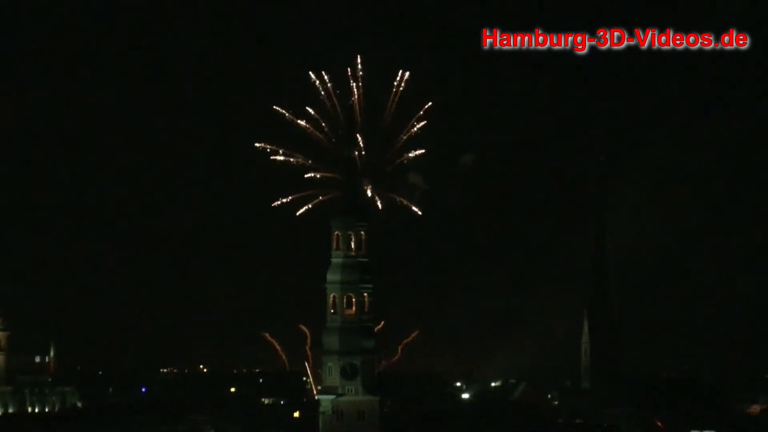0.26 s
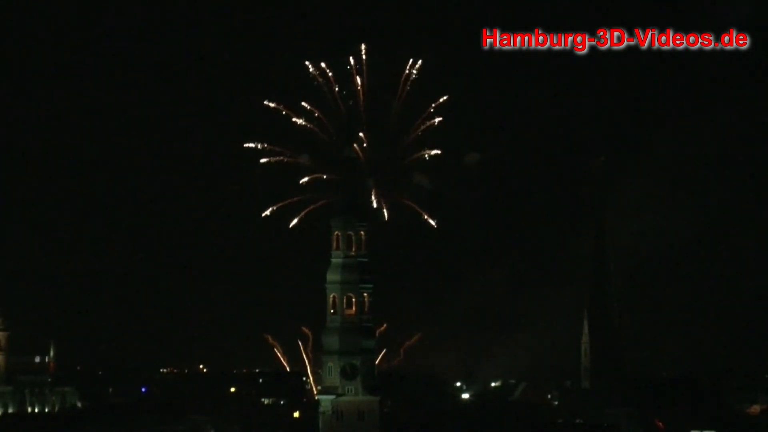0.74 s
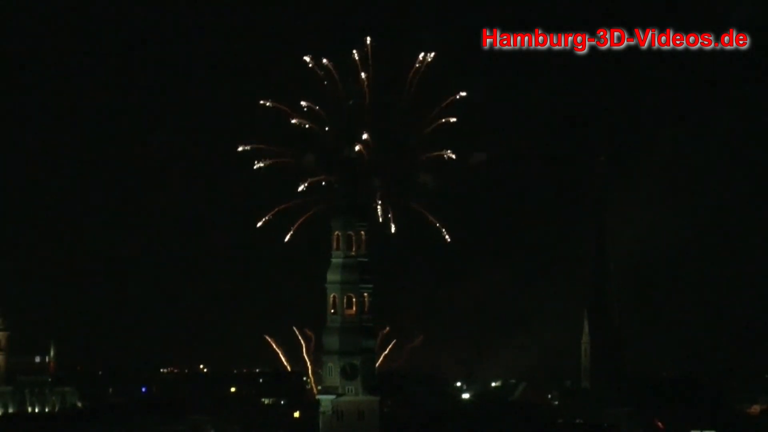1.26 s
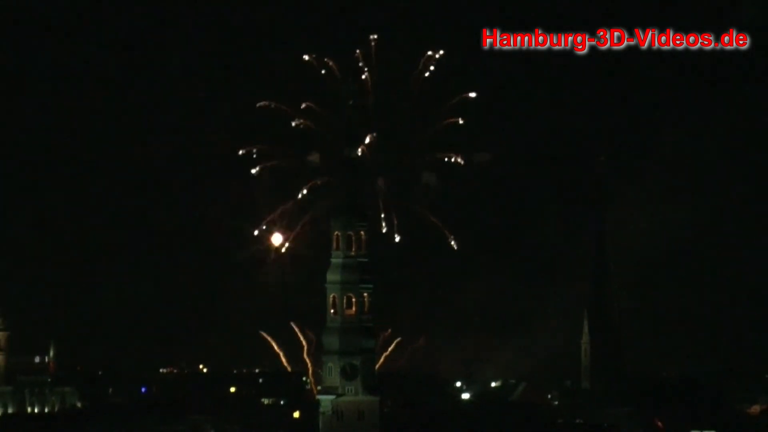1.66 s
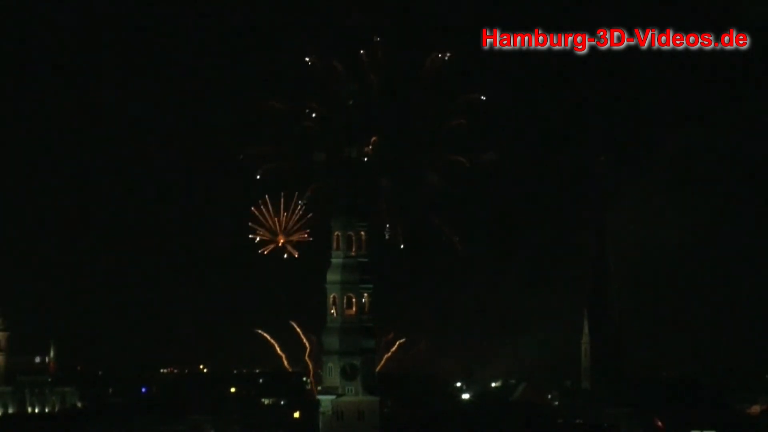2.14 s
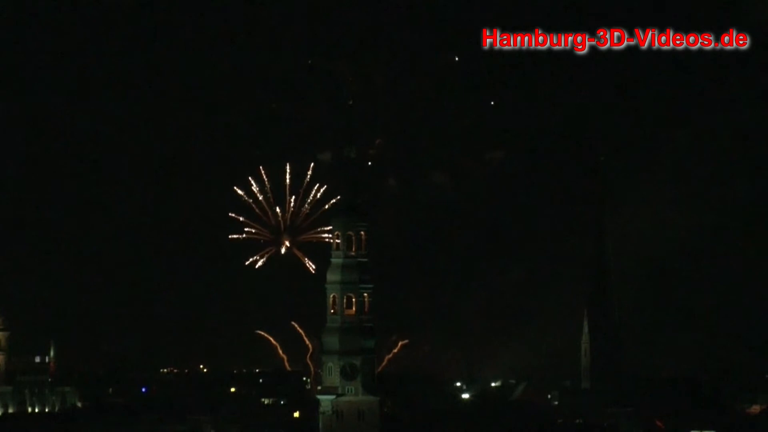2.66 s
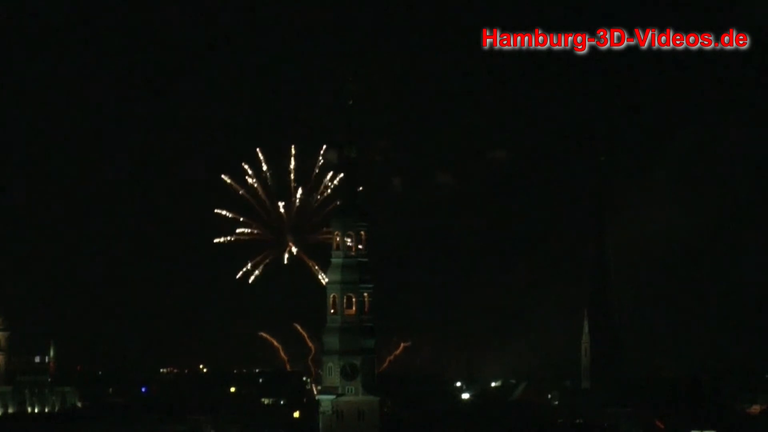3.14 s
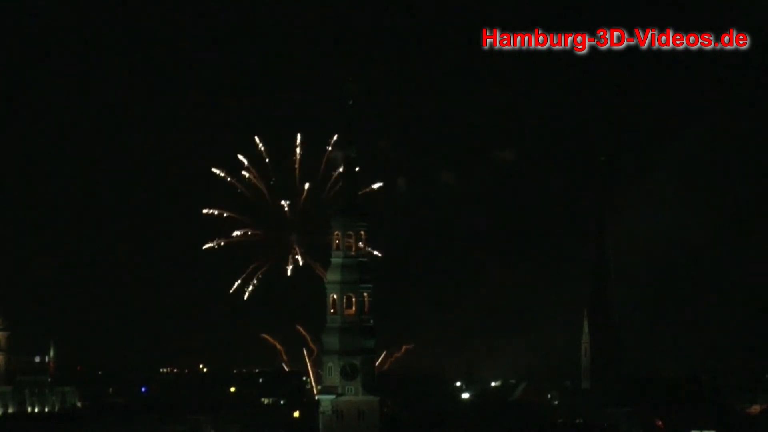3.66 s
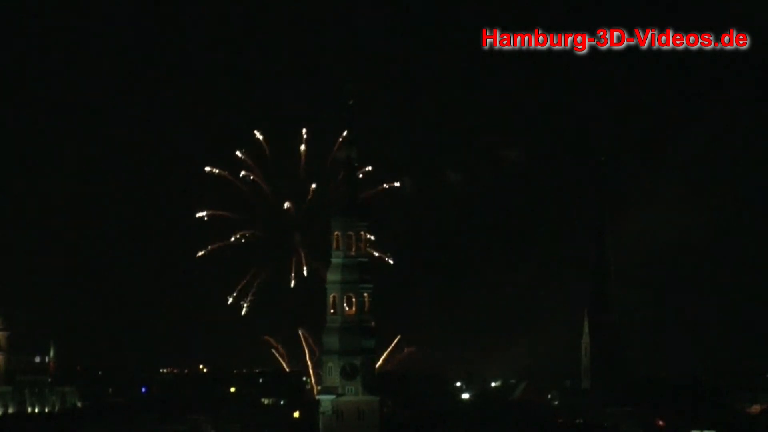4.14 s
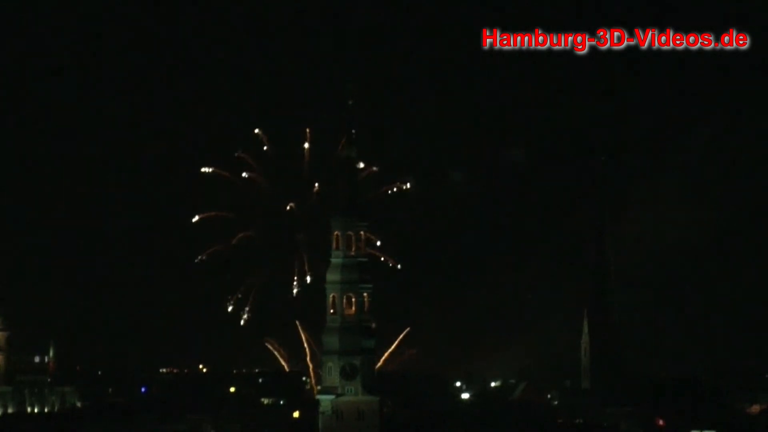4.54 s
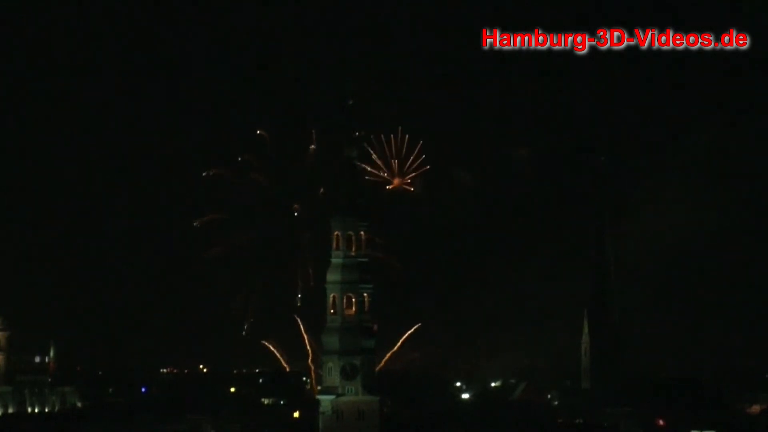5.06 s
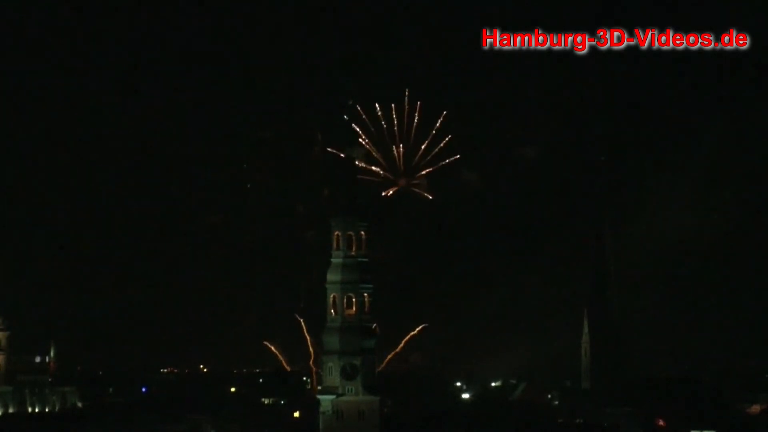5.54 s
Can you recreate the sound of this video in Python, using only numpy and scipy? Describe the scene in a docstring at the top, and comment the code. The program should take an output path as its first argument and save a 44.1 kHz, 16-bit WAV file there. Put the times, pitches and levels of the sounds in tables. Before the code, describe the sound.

Distant fireworks bang over a rolling rumble of echoes, with faint crackles and wind buffeting the microphone.

```python
"""Firework shells bang now and then over a town at night, far from a small camera in a breeze.
Each bang is a push of pressure and a pull of suction, dulled by the air. Echoes off roofs and walls merge
with the rush of comets into a rolling roar, while faint ticks and sparks flick through the treble.
Wind buffets the microphone over a thin circuit hiss, and the loudest bang overloads."""
import sys
import numpy as np
from scipy import signal
from scipy.fft import rfft, irfft, next_fast_len
from scipy.io import wavfile
from scipy.ndimage import uniform_filter1d

SR = 44100
rng = np.random.default_rng(int(sys.argv[2]) if len(sys.argv) > 2 else 0)


def master_out(mix):
    """Clip the mix to full scale and print it as 16-bit PCM to the path in sys.argv[1]."""
    frames = np.transpose(np.atleast_2d(mix))
    ceiling = np.clip(frames, -1, 1)
    pcm = np.round(ceiling * 32767).astype(np.int16)
    wavfile.write(sys.argv[1], SR, pcm)


N = 255339

# Tone curves of the noise layers: f/Hz, relative level/dB
HISS_EQ = [(3000, -16), (6000, -12), (10000, -14), (17000, -14)]  # circuit noise
HEAVE_EQ = [(8, 11), (16, -1), (28, 2.5), (42, -4), (60, -27.5), (110, -46)]  # slow wind
FLUTTER_EQ = [(30, -18.5), (46, 1.5), (75, -3.5), (105, -10.5), (200, -39.5)]  # quick wind
SIZZLE_EQ = [(2600, -3.5), (3600, 0), (5500, -8), (7000, -13), (9000, -22), (13000, -39)]  # sparks
RUSH_EQ = [(500, -10), (900, -1), (1200, -2), (1800, -7.5), (2400, -14), (3200, -25.5), (4200, -49),
           (6000, -64)]  # comets
ROAR_EQ = [(150, -9), (260, 7.5), (400, 4), (600, 4), (900, -9), (1500, -36.5)]  # body of the echoes
BOOM_EQ = [(60, -24), (95, 1.5), (150, 0.5), (220, -6), (300, -22.5), (450, -47)]  # low end of the echoes
# Whine of the electronics: f/Hz, rms level at the average hiss level/dB
WHINE_TONES = [(5200, -90), (6934, -90.5), (10002, -99.5), (12134, -89), (13867, -94.5)]
# Cues where the background drops after a loud peak: t/s, depth/dB
DIP_CUES = [(0.333, -9), (1.376, -5), (2.438, -1), (2.929, -4), (3.09, -3.5), (3.565, -7.5), (3.932, -6),
            (4.078, -4.5), (4.3, -4.5), (4.591, -4), (4.778, -4), (4.999, -3.5), (5.163, -6.5),
            (5.35, -3.5), (5.545, -5), (5.72, -4.5)]
# Strength of the breeze, before the dips: t/s, heave/dB, flutter/dB
BREEZE_FADERS = [(0, -12, -30.5), (.45, -19, -25.5), (.8, -19, -25), (1.2, -28.5, -26), (1.8, -31, -33),
                 (2.2, -27.5, -30), (2.75, -16, -26.5), (3.0, -11.5, -9), (3.3, -23, -25),
                 (3.62, -15.5, -28), (3.801, -15, -13), (4.3, -12, -21.5), (4.8, -16.5, -18),
                 (5.4, -14, -14), (5.79, -5.5, -14.5)]
# Single buffets on the microphone, before the dips: t/s, heave/dB, flutter/dB
BUFFET_CUES = [(0.022, -26, -20.5), (0.131, -24, -30), (.22, -22, -35), (0.659, -16, -22), (.76, -6, -30),
               (1.17, -36, -31), (1.66, -16.5, -27), (1.98, -39, -24.5), (2.1, -36, -33), (2.391, -14, -19),
               (2.669, -8, -36), (2.9, -15, -14.5), (3.021, -6.5, -8), (3.119, -4, -23),
               (3.41, -15.5, -17.5), (3.49, -12.5, -30), (3.72, -9, -10.5), (3.791, -13.5, -20.5),
               (3.85, -11, -18), (3.93, -3.5, -17), (3.99, -12, -18.5), (4.06, -5, -17.5), (4.114, -2, -30),
               (4.291, -25, -10), (4.374, -14, -28), (4.445, -18, -26), (4.5, -10, -31), (4.582, -21, -15),
               (4.679, -18, -8), (4.77, -5, -25), (4.92, -10, -26), (4.99, -2, -20), (5.172, 1, -8),
               (5.351, -3.5, -28), (5.54, 3.5, -2), (5.659, -10, -1), (5.719, 1, -16)]
# Bursts of sparks, before the dips: t/s, hold/s, level/dB, f/Hz
SPARK_CUES = [(0.256, 0.07, -66, 4520), (0.597, 0.096, -62.5, 4200), (0.75, 0.21, -69, 5400),
              (1.002, 0.23, -72, 5470), (1.32, 0.044, -66, 4400), (1.6, 0.29, -79, 4530),
              (2.265, 0.057, -65, 4200), (2.57, 0.049, -87, 4500), (2.753, .17, -82, 4500),
              (3.089, 0.16, -59, 4600), (3.317, 0.023, -58, 4000), (3.4, 0.087, -67, 5240),
              (4.954, 0.06, -65, 6300), (5.394, 0.068, -67, 4480), (5.633, 0.075, -75.5, 4500)]
# Treble ticks: t/s, band peak/dB, f/Hz, top-end rms over TOP_SPAN_S/dB
TICK_CUES = [(0.3265, -45, 4280, -58), (0.3288, -33.5, 3200, -54), (0.9278, -46, 5610, -62),
             (1.1564, -48, 5310, -62), (1.3139, -49, 4000, -65), (1.394, -49, 5000, -70),
             (1.42, -49, 4750, -72), (2.2962, -44, 4170, -67), (2.8644, -47, 4090, -62),
             (2.9043, -44, 4000, -58), (2.9246, -44, 4490, -54), (3.0364, -45, 4020, -63),
             (3.0889, -48, 4140, -65), (3.1108, -47, 4110, -70), (3.1467, -53, 5070, -71),
             (3.1744, -43, 4310, -66), (3.245, -50, 4110, -70), (3.3039, -55, 4160, -70),
             (3.3194, -44, 4250, -69), (3.4975, -36, 5000, -62), (3.5, -46, 6800, -62),
             (3.5583, -16.5, 3560, -46), (3.5857, -52, 4100, -78), (3.706, -46, 4380, -74),
             (3.828, -45, 4090, -72), (3.928, -40.5, 4340, -62), (3.962, -45.5, 4060, -59),
             (4.0612, -44, 4000, -61), (4.08, -47, 2500, -73), (4.293, -51, 5000, -60),
             (4.2985, -43, 4540, -60), (4.4986, -46, 4100, -65), (4.59, -40, 5000, -57),
             (4.775, -42, 4030, -63), (4.8894, -56, 4150, -66), (4.9814, -45, 4010, -60),
             (5.006, -49, 4110, -59), (5.158, -43.5, 4110, -71), (5.19, -46, 4010, -67),
             (5.4116, -48, 4030, -68.5), (5.4595, -51, 4160, -70), (5.5356, -40, 4080, -60),
             (5.575, -58, 7000, -71), (5.655, -39, 3940, -61), (5.678, -42, 4330, -57),
             (5.696, -41, 3980, -60), (5.717, -44, 4000, -66)]
# Running bed of the display, before the dips: t/s, rush/dB, roar/dB, boom/dB
DISPLAY_FADERS = [(0, -32, -30.5, -30.5), (.3, -32.5, -33, -27.5), (.6, -30, -24, -17),
                  (1.0, -36, -28.5, -25), (1.15, -33, -27.5, -21.5), (1.4, -28.5, -26, -21.5),
                  (1.55, -27.5, -27, -22), (1.9, -28, -27, -26.5), (2.2, -29, -28.5, -26),
                  (2.38, -29, -28, -25), (2.52, -35.5, -39, -35), (2.61, -29, -27.5, -27),
                  (2.69, -33, -34.5, -29.5), (2.82, -30, -29.5, -26.5), (3.3, -32.5, -32, -27),
                  (3.5, -35, -32, -26.5), (3.9, -33.5, -27, -17.5), (4.15, -40, -28, -21.5),
                  (4.3, -33, -28.5, -19), (4.5, -36, -28, -24.5), (4.75, -34, -30, -22),
                  (5.0, -32.5, -29.5, -23.5), (5.4, -27.5, -26, -20.5), (5.7, -34.5, -35.5, -29),
                  (5.79, -40, -40, -25)]
# Starts of the big shells' rolls over the town, before the dips: t/s, rush/dB, roar/dB, boom/dB
ROLL_CUES = [(0.333, -31.5, -20, -15.5), (3.565, -34, -22.5, -14.5)]
# Shell bangs and a few of their separate echoes: t/s, level before the air filters/dB, rise/ms,
# front curve (0 square, 1 ramp), suction/share of the push, recovery/ms, echo delay/ms, echo gain/dB,
# air cutoff/Hz
BANG_CUES = [(0.3283, -3.5, 2.67, 0.036, 0.9, 3.6, 6.8, -7.5, 2400),
             (.931, -1.5, 0.71, 0.96, 0.8, 1.5, 19, -14, 890), (1.158, -10.5, 2, 1, 1.5, 2.1, 7.3, -2, 600),
             (1.3636, -5.5, 0.94, 0.35, 1.3, 1, 12, -8, 1100),
             (1.758, -23, 2.6, 0.27, 1.4, 2.8, 6.1, 12, 700),
             (3.438, -9.5, 0.51, 0.4, 1.2, 0.87, 1.92, 5, 900),
             (3.559, 3.5, 0.99, 0.31, 0.55, 3.6, 5.6, -9.5, 1800),
             (3.859, -14, 6.6, 0.43, 0.65, 1.7, 2.9, -8, 600),
             (4.0797, -2, 1.08, 0.42, 0.4, 0.34, 1.57, 1.5, 1600),
             (4.0838, -8.5, 2.5, 0.1, 0.17, 1.6, 2.2, -14, 2200),
             (4.11, -27, 2.3, 0.54, 0.61, 1.5, 4.9, 1, 900),
             (4.295, -10, 2.9, 0.87, 0.73, 2.1, 3.35, 4, 605),
             (4.566, -15.5, 1.6, 0.49, 1.3, 1.5, 6.8, -10, 600)]

HISS_DB, SPARK_FLOOR_DB = -68.5, -64.5
TOP_SPAN_S = .003


def undb(db):
    """Decibels to gain."""
    return 10 ** (np.asarray(db) / 20)


def unit(x):
    """Scale to rms 1."""
    return x / np.sqrt(np.mean(x ** 2))


def add_db(*levels):
    """Level in dB of unrelated sounds heard together."""
    return 10 * np.log10(sum(undb(db) ** 2 for db in levels))


def faders(t, table):
    """The level columns of a table as straight fader moves in time."""
    times, *columns = np.transpose(table)
    return np.array([np.interp(t, times, column) for column in columns])


def colour(x, eq):
    """Shape a signal with a tone curve, at rms 1."""
    hz, db = np.transpose(eq)
    size = next_fast_len(N)
    f = np.maximum(np.arange(size // 2 + 1) * SR / size, 1)
    gain = undb(np.interp(np.log(f), np.log(hz), db, -160, -160))
    return unit(irfft(rfft(x, size) * gain, size)[:N])


def band(x, hz, width):
    """A gentle band-pass around hz; width is a share of hz."""
    edge = 1 + width / 2
    return signal.sosfilt(signal.butter(1, [hz / edge, hz * edge], "band", fs=SR, output="sos"), x)


def wobble(rate_hz):
    """A smooth random drift: held steps, slewed twice."""
    hold = int(SR / rate_hz)
    steps = np.repeat(rng.standard_normal(N // hold + 1), hold)[:N]
    return uniform_filter1d(uniform_filter1d(steps, hold), hold)


def grit(per_s, spread_db, share):
    """Scattered pulses of uneven size, carrying a share of the power, over smooth noise."""
    hits = rng.random(N) < per_s / SR
    sizes = undb(spread_db * np.minimum(rng.exponential(size=N), 4))
    pulses = hits * sizes * np.sign(rng.standard_normal(N))
    return np.sqrt(share) * unit(pulses) + np.sqrt(1 - share) * rng.standard_normal(N)


def dips(t, hold_s=.079, climb_db_per_s=15):
    """Background level change in dB: drop, hold and climb back at each cue; the deepest dip wins."""
    each = [(t >= s) * np.minimum(db + climb_db_per_s * np.maximum(t - s - hold_s, 0), 0)
            for s, db in DIP_CUES]
    return np.min(each, axis=0)


def circuit_hiss(t, dip_db):
    """The camera's own noise and a thin whine that sinks and swells with it."""
    whine = sum(np.sqrt(2) * undb(db) * np.sin(2 * np.pi * hz * t) for hz, db in WHINE_TONES)
    hiss = colour(rng.standard_normal(N), HISS_EQ)
    return hiss * undb(HISS_DB + dip_db) + whine * undb(dip_db - dip_db.mean())


def wind(t, dip_db, buffet_s=.023, limit=.68):
    """Wind buffets the microphone in lumpy swings; the strongest are softly limited."""
    buffets = [np.array(db)[:, None] - 10 * ((t - s) / buffet_s) ** 2 for s, *db in BUFFET_CUES]
    heave_db, flutter_db = add_db(faders(t, BREEZE_FADERS), *buffets) + dip_db
    eddies = grit(per_s=45, spread_db=1.5, share=.4)
    centres = (np.array(BUFFET_CUES)[:, 0] * SR).astype(int)
    eddies[centres] += 30 * np.sign(rng.standard_normal(len(centres)))  # a strong eddy in each buffet
    heave = colour(eddies, HEAVE_EQ) * undb(heave_db)
    flutter = colour(eddies, FLUTTER_EQ) * undb(flutter_db)
    return limit * np.tanh((heave + flutter) / limit)


def sparks(t, dip_db, edge_s=.026):
    """Burning sparks crackle faintly and flare in gritty bursts, each with its own pitch and hold."""
    crackle = colour(grit(per_s=500, spread_db=3.3, share=.35) * undb(1.6 * wobble(40)), SIZZLE_EQ)
    out = crackle * undb(SPARK_FLOOR_DB)
    for s, hold_s, db, hz in SPARK_CUES:
        fade_db = 10 * np.maximum(np.abs(t - s - hold_s / 2) - hold_s / 2, 0) / edge_s
        out += unit(band(crackle, hz, width=.39)) * undb(db - fade_db)
    return out * undb(dip_db)


def ticks(fade_ms=1.0):
    """Each tick is a pitched spit of a millisecond or two, some with a bright top end."""
    out, ms = np.zeros(N), np.arange(300) / SR * 1000
    for s, db, hz, top_db in TICK_CUES:
        click = rng.standard_normal(len(ms)) * np.exp(-ms / fade_ms)
        body = band(click, hz, width=1)
        top = signal.sosfilt(signal.butter(2, 5600, "high", fs=SR, output="sos"), click)
        top *= np.sqrt(TOP_SPAN_S * SR / np.sum(top ** 2))
        start = int(s * SR)
        out[start:start + len(ms)] += undb(db) * body / np.abs(body).max() + undb(top_db) * top
    return out


def display_db(t, fade_db_per_s=27.5):
    """Rush, roar and boom levels: the running bed plus the fading roll of each big shell."""
    rolls = [np.array(db)[:, None] - np.where(t >= s, fade_db_per_s * (t - s), np.inf)
             for s, *db in ROLL_CUES]
    return add_db(faders(t, DISPLAY_FADERS), *rolls)


def comet_rush(db, throb):
    """Comets burn with a soft rushing noise."""
    burn = grit(per_s=1500, spread_db=2.4, share=.34) * undb(1.5 * throb)
    return colour(burn, RUSH_EQ) * undb(db)


def echo_roar(db, throb):
    """Countless far echoes form the body of the rumble, throbbing as clusters come and go."""
    echoes = grit(per_s=500, spread_db=3.5, share=.35) * undb(1.8 * throb)
    return colour(echoes, ROAR_EQ) * undb(db)


def echo_boom(db):
    """The low end of the rumble: fewer, bigger thuds."""
    thuds = grit(per_s=70, spread_db=3.2, share=.5) * undb(1.8 * wobble(14))
    return colour(thuds, BOOM_EQ) * undb(db)


def air(x, cutoff_hz, order):
    """The long way through the air takes off the treble and rounds every edge."""
    return signal.sosfiltfilt(signal.butter(order, cutoff_hz, fs=SR, output="sos"), x)


def shell_bangs(ring_hz=1200, ring_t60_ms=8, echo_blur_ms=.28, tail_t60_ms=50):
    """Pressure builds, snaps into suction and rings briefly; one near echo and a short tail follow."""
    out, lead = np.zeros(N), 400
    ms = np.arange(-lead, 6000) / SR * 1000  # zero at the snap
    after_ms = np.maximum(ms, 0)
    for s, db, rise_ms, curve, suction, recovery_ms, echo_ms, echo_db, air_hz in BANG_CUES:
        push = np.clip(1 + ms / rise_ms, 0, 1) ** curve * (ms < 0) * (ms > -rise_ms)
        pull = suction * np.exp(-(after_ms / recovery_ms) ** 3.2) * (ms >= 0)  # holds, then lets go
        ring = np.sin(2 * np.pi * ring_hz * after_ms / 1000) * undb(-9 - 60 * after_ms / ring_t60_ms)
        # the near echo pulls back less and comes rounded
        echo = uniform_filter1d(push - .27 * pull, 1 + int(echo_blur_ms * SR / 1000))
        echo = undb(echo_db) * np.interp(ms - echo_ms, ms, echo, left=0)
        dark_noise = unit(signal.lfilter([1], [1, -.93], rng.standard_normal(len(ms))))
        tail = dark_noise * (ms > 0) * undb(-18 - 60 * after_ms / tail_t60_ms)
        start = int(s * SR) - lead
        out[start:start + len(ms)] += undb(db) * air(push - pull + ring + echo + tail, air_hz, order=1)
    return air(out, cutoff_hz=2160, order=3)


def scene(duck_depth=5, duck_s=.008):
    """Mono mix: the bangs stand in front of the rumble, sparks, wind, ticks and hiss."""
    t = np.arange(N) / SR
    dip_db = dips(t)
    rush_db, roar_db, boom_db = display_db(t) + dip_db
    throb = wobble(20)  # rush and roar pulse together
    rumble = comet_rush(rush_db, throb) + echo_roar(roar_db, throb) + echo_boom(boom_db)
    bed = rumble + sparks(t, dip_db) + wind(t, dip_db)
    bangs = shell_bangs()
    # gain control ducks the bed for the few milliseconds that a bang lasts
    duck = 1 / (1 + duck_depth * uniform_filter1d(np.abs(bangs), int(duck_s * SR)))
    return (bed * duck + bangs + ticks() + circuit_hiss(t, dip_db))[None]


def record(dry, ceiling=.96, top_hz=15800):
    """The camera flattens the highest peak and cuts the top end."""
    high_cut = signal.ellip(6, .1, 40, top_hz, fs=SR, output="sos")
    return signal.sosfiltfilt(high_cut, np.clip(dry, -ceiling, ceiling))


dry = scene()
out = record(dry)
master_out(out)
```